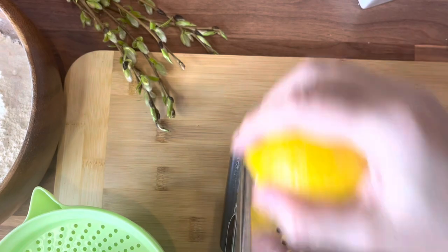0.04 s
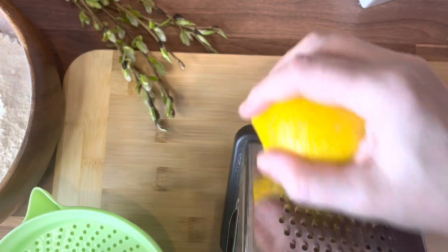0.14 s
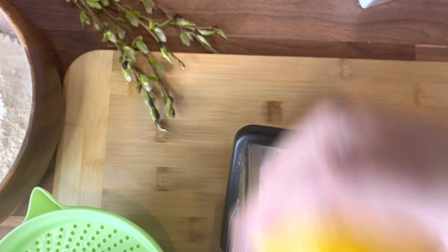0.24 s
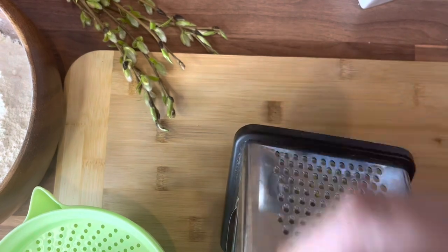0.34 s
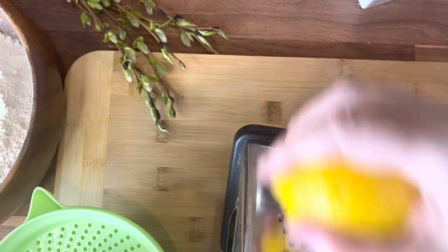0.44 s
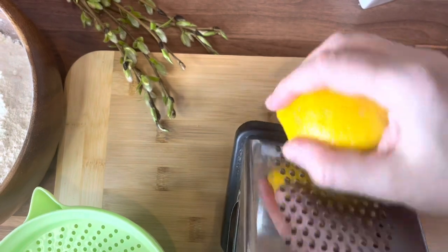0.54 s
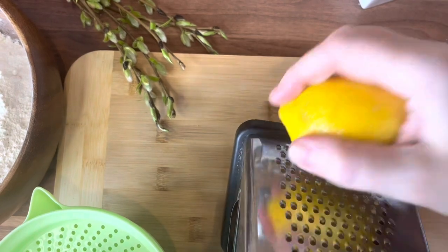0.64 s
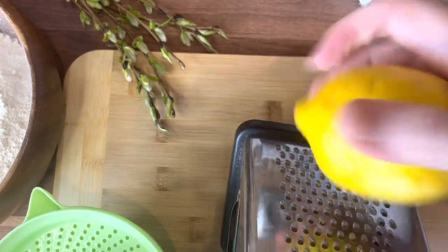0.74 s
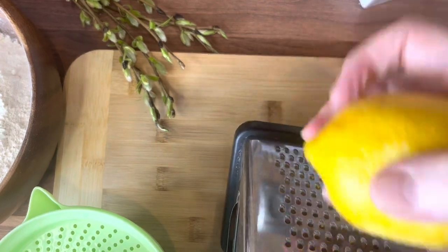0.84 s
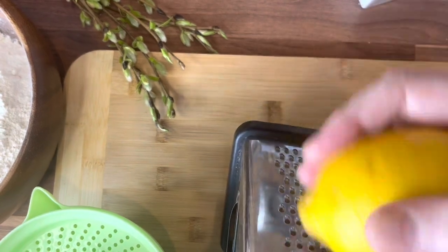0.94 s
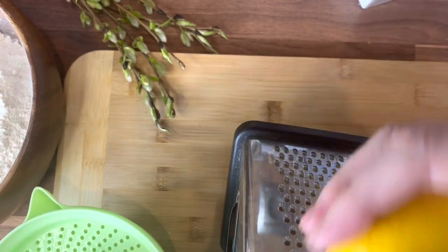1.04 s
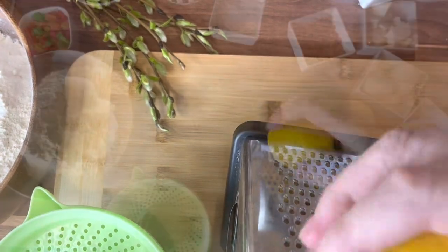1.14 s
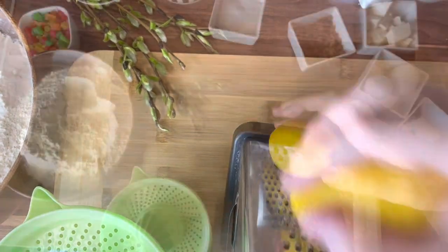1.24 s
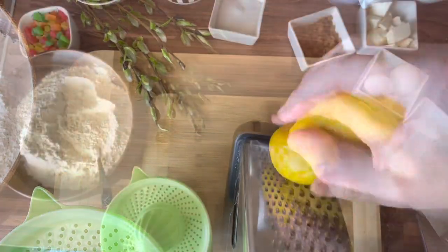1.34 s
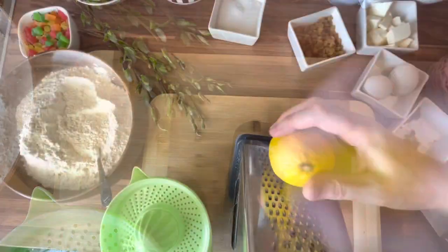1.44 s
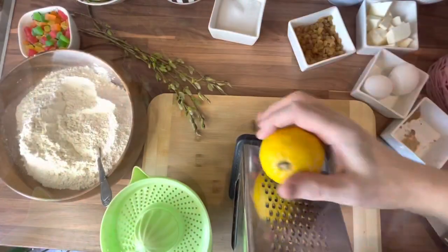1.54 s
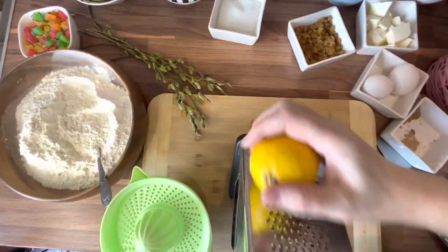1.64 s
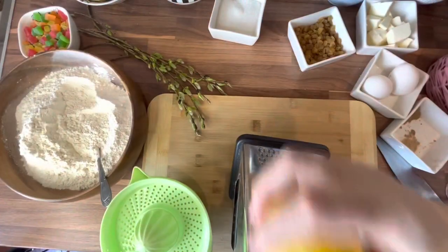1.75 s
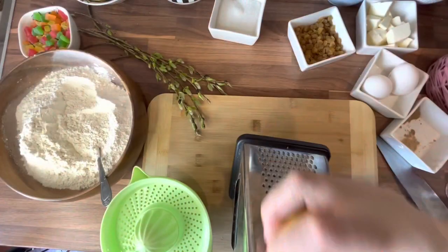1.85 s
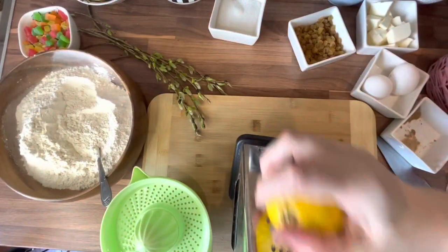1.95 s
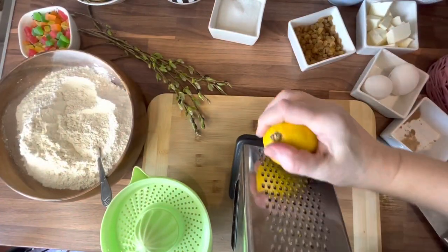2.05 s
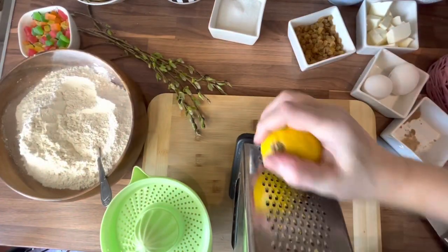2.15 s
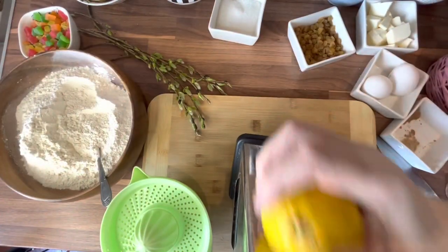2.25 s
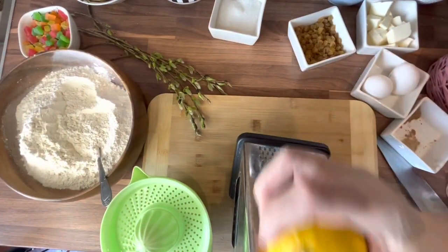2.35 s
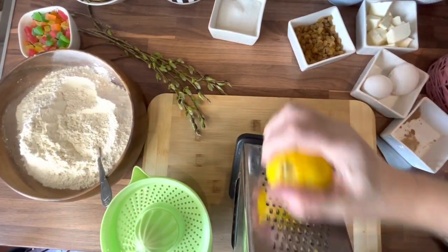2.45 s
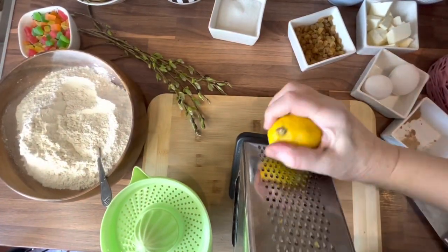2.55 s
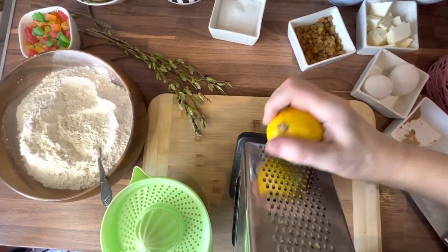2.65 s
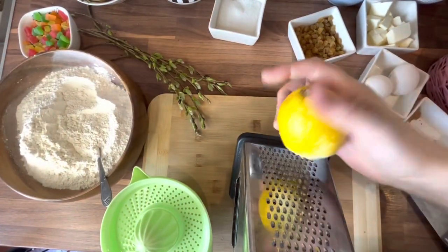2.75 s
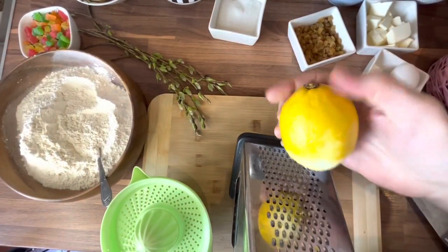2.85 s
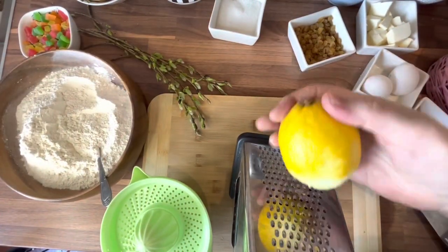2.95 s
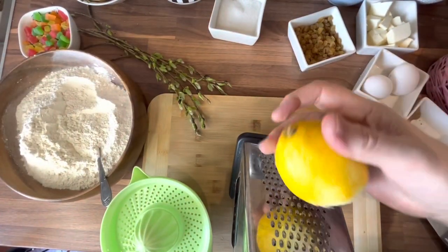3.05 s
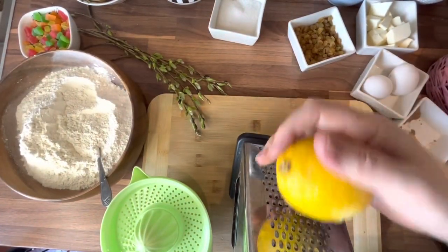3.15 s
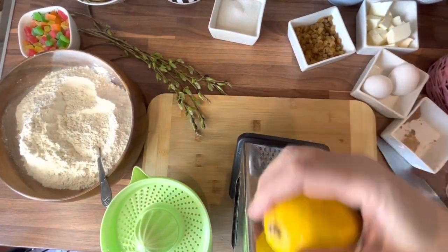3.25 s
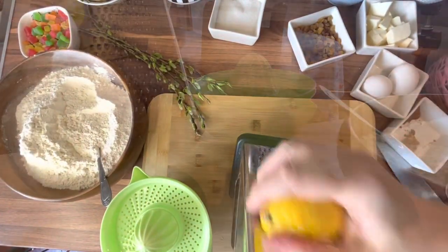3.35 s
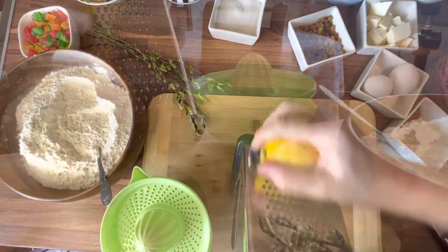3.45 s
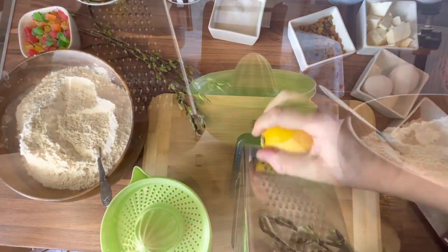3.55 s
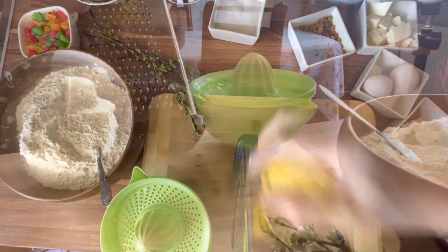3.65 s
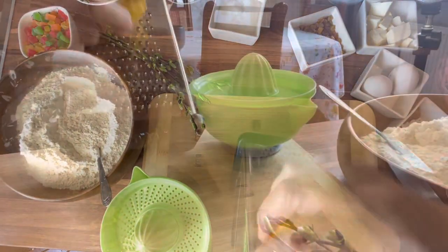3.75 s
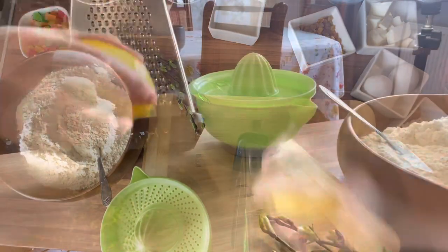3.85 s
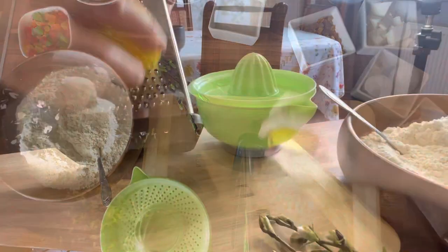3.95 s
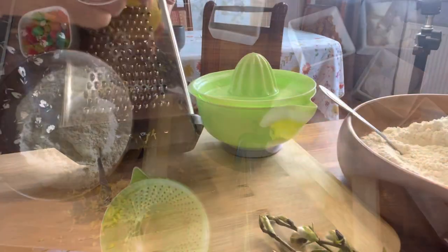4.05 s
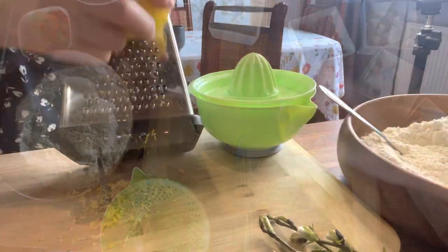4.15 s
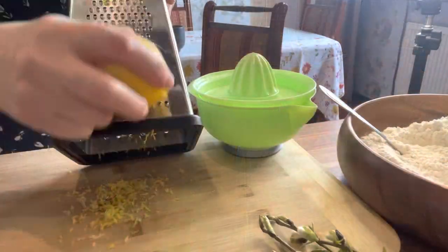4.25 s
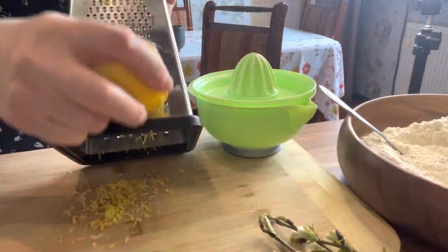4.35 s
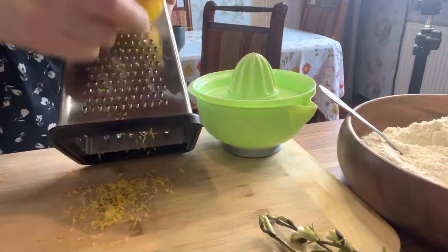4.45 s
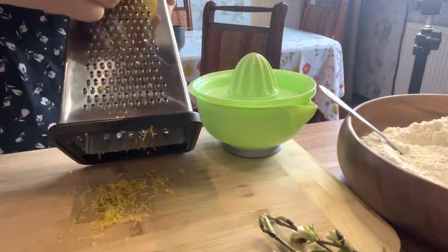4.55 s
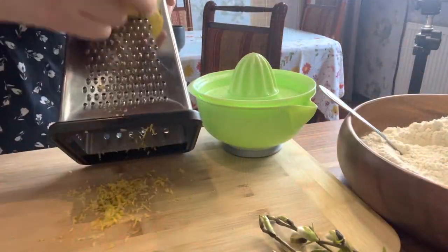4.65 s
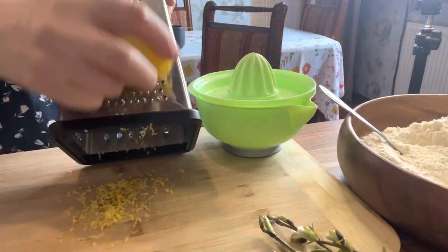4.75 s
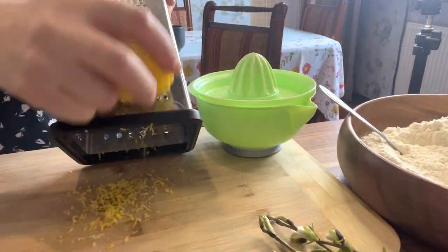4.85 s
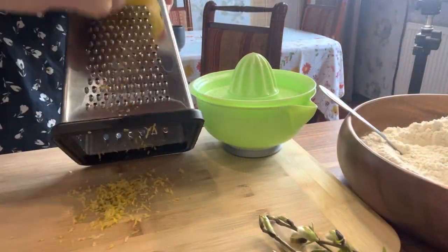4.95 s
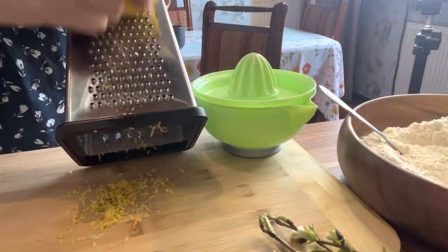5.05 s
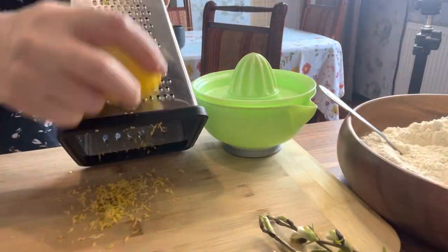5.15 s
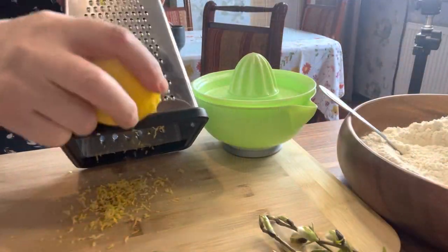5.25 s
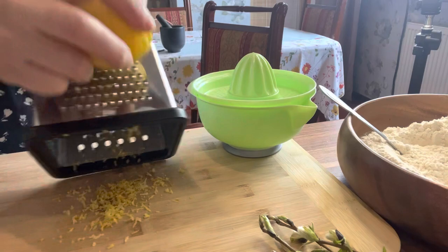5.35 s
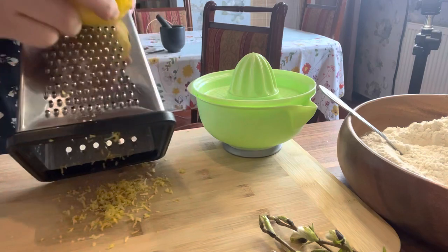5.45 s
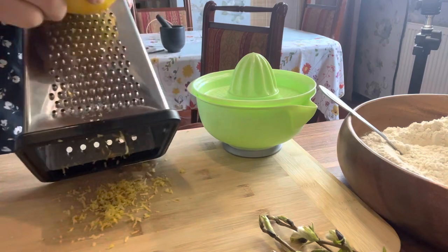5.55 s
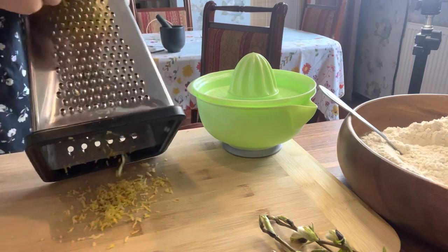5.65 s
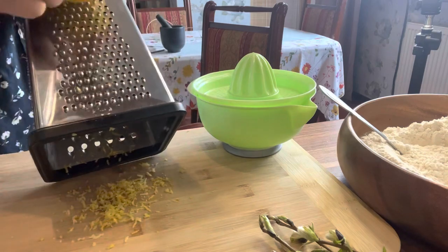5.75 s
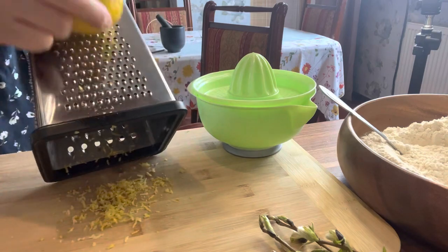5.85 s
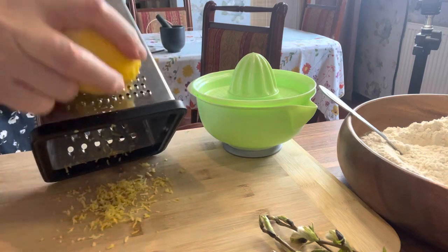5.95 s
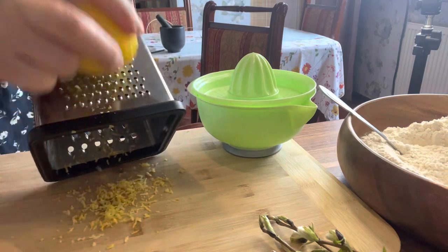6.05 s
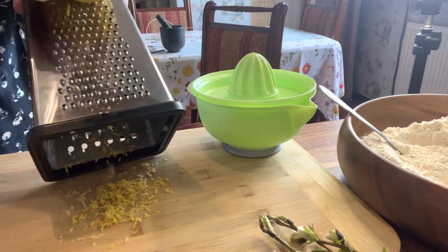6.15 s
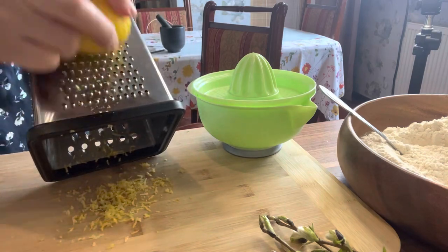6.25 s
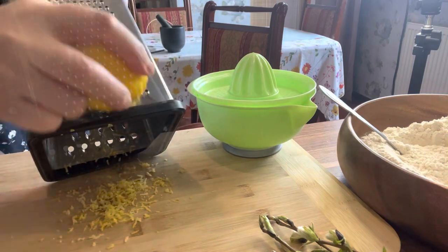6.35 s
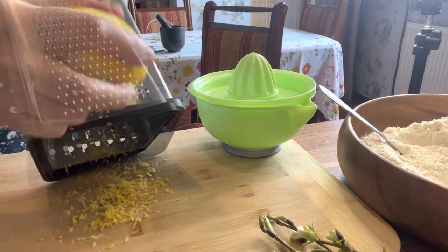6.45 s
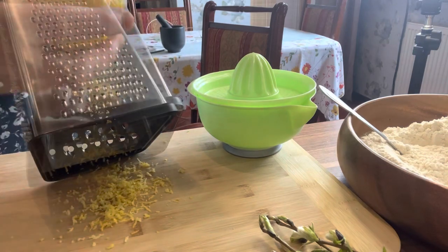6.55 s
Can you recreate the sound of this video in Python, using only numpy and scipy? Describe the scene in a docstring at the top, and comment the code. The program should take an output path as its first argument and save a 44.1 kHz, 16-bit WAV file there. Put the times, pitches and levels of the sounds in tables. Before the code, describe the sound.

A close, wide stereo sound of lemon zesting on a hollow steel box grater over a wooden board, in a lightly reverberant kitchen with very faint rumble and hum. It opens mid-stroke with a low, ringing scrape at 0 s, then coarse rasps of about a tenth of a second at 0.4, 1.2, 1.9 and 2.4 s, the last strongest. Each shakes box and board with a dull judder; sharp tooth ticks mark some bites, and soft knocks precede most strokes. Nearly quiet from about 2.7 to 3.3 s, with faint rubs. Around 3.5 to 3.9 s the perspective shifts from above to the front. Rasps follow at 3.4, 3.8, 4.2, 4.7 and 5.1 s, increasingly bright. A deep thump at 5.2 s leads to a hard return rub with a squeal at 5.3 s. Final strokes at 5.9 and 6.25 s squeak higher, with another thump near 6.35 s.

```python
"""In a kitchen, a lemon is zested on a steel box grater propped on a wooden board: a dozen uneven strokes.
Trains of tooth impulses and noise make the rasp; resonances driven by further impulses ring the steel
and shake box and board. Noise bursts tick, decaying sines thump, and resonant bands squeal or ring low.
The rasp's colour passes from that heard above to that heard in front, over a faint rumble and hum."""
import sys
import numpy as np
from scipy import signal
from scipy.fft import rfft, irfft, next_fast_len
from scipy.io import wavfile
from scipy.ndimage import map_coordinates

SR = 44100
rng = np.random.default_rng(int(sys.argv[2]) if len(sys.argv) > 2 else 0)


def wrap_up_sound(samples):
    """Save the sound to the file named by the first command line argument, as 16-bit audio."""
    columns = np.atleast_2d(samples).T
    # keep every value between -1 and 1, then stretch to whole-number steps
    tamed = np.clip(columns, -1, 1)
    steps = np.round(tamed * 32767).astype(np.int16)
    wavfile.write(sys.argv[1], SR, steps)


N = 291009  # samples

# All tabulated levels are relative: the sources are weighted again where they are mixed.
# Pushes of the lemon down the teeth: (first bite [s], length [s], fall [s], rasp [dB],
# gain of pressure over the pass [dB], treble gain [dB], shaking of the box [dB],
# graze before the bite [s], graze [dB])
STROKES = [ (0.0, 0.089, 0.027, -27, -6.5, -6, -31.5, .01, -45.5),
           (0.39, 0.14, 0.035, -25, -5.5, -4, -31, 0.028, -29.5),
           (1.201, 0.11, 0.051, -23, 1.5, -2.5, -31, 0.032, -41),
           (1.888, 0.12, 0.12, -23.5, 8.5, -3.5, -30, 0.045, -39),
           (2.378, 0.12, .06, -19.5, 1.5, 0.5, -27, .014, -50),
           (3.368, 0.096, 0.093, -24.5, 3.5, -1, -33, 0.027, -38),
           (3.806, 0.13, 0.065, -30.5, 0, 3, -33.5, 0.053, -44),
           (4.18, 0.11, 0.084, -26.5, -3, 4, -27.5, 0.028, -42),
           (4.681, 0.14, 0.028, -25.5, 6, 5.5, -27.5, 0.037, -49.5),
           (5.101, 0.11, 0.055, -23, -8.5, 5.5, -25, 0.026, -37),
           (5.885, .107, 0.054, -25, -3, 7, -26, .052, -38),
           (6.25, 0.11, 0.067, -25, -4.5, 8, -24.5, .02, -39.5)]
# Return rubs of the lemon over the teeth, mostly light, one pressed hard:
# (time [s], length [s], rasp [dB], treble gain [dB], shaking of the box [dB])
RETURN_RUBS = [(0.144, 0.023, -59.5, 3, -54), (0.708, 0.047, -56.5, 4, -87), (0.911, 0.081, -69, 15, -85),
               (1.434, 0.076, -47, -7, -50), (1.565, 0.042, -74.5, 11, -55.5), (1.735, 0.061, -64, 5, -49),
               (2.234, 0.037, -58, 6, -61.5), (2.659, 0.14, -63, 0.5, -62.5), (3.262, 0.038, -66.5, 2, -43),
               (3.622, 0.067, -71.5, -8, -50), (4.085, 0.008, -69, 10, -58), (4.961, 0.051, -66.5, -7, -46),
               (5.315, 0.072, -28, -6, -28.5), (5.522, 0.1, -60, 2.5, -41.5), (6.149, 0.019, -42.5, 0, -39)]
# Squeals of wet peel, and one low ring of the sheet at the first stroke:
# (time [s], length [s], frequency [Hz], level [dB])
SQUEALS_AND_RING = [(0.0, .1, 330, -35.5), (5.293, 0.09, 1950, -33.5), (5.575, 0.064, 1930, -55.5),
                    (5.928, 0.074, 2140, -28.5), (6.223, 0.095, 3500, -31.5)]
# Single teeth flicking free: (time [s], level [dB])
TICKS = [(0.394, -12), (0.756, -38), (0.905, -42.5), (1.178, -31), (1.889, -18.5), (2.373, -11.5),
         (2.854, -40), (2.928, -49.5), (4.679, -16), (5.685, -39.5), (6.226, -25)]
# The lemon landing on the grater: (time [s], knock [dB], swing frequency [Hz], swing [dB])
LANDINGS = [(0.305, -47.5, 69, -43.5), (1.042, -39.5, 130, -44.5), (1.558, -44.5, 130, -47),
            (1.743, -39, 95, -39.5), (2.316, -43, 80, -26), (3.236, -40.5, 77.5, -33.5),
            (3.752, -60, 94, -32.5), (4.143, -52, 190, -38), (4.588, -43.5, 144, -41),
            (5.071, -50, 88, -31), (5.836, -32.5, 75.5, -31)]
# Thumps of the box as the lemon lands on it or jerks across it: (time [s], frequency [Hz], level [dB])
THUMPS = [(0.323, 68, -34), (0.367, 79, -22), (2.369, 81, -33.5), (5.174, 191.5, -13.5),
          (6.353, 193.6, -16)]
# Modes of the steel sheet: (frequency [Hz], width [Hz], level [dB])
STEEL = [(333, 40, -0.5), (468, 30, 1), (656, 54, 0.5), (1026.4, 44, 11.5), (1253, 20, 11),
         (1402, 21, 12.5), (2034, 130, 3.5), (2463, 110, 5), (2640, 45, 6), (2900, 87, 3.5),
         (3010, 30, -10.5), (3820, 88, -16), (3980, 160, -6)]
# Modes of box and board: (frequency [Hz], width [Hz], level [dB])
BOX = [(54.7, 23, -9), (76.7, 9, 2), (133.7, 15.1, 6), (167, 20.4, -1), (193.9, 18.2, 0.5),
       (234.2, 30.2, -6.5), (299, 21, -13.5)]
# Modes of the plastic rim and handle: (frequency [Hz], width [Hz], level [dB])
FRAME = [(477, 86, -6), (680, 49, -4), (1070, 160, -3.5), (1310, 89, -0.5), (2050, 480, -15.5),
         (2670, 340, -23.5)]
# Spectral density of the rasp from above: (frequency [Hz], level [dB])
RASP_ABOVE = [(60, -19), (200, -20.5), (330, -1), (520, -3.5), (800, -10), (1100, -6), (1800, -2),
              (2700, -1), (5200, -4.5), (7800, -15), (12700, -12.5), (14200, -29.5), (15500, -55.5)]
# Spectral density of the rasp from the front: (frequency [Hz], level [dB])
RASP_FRONT = [(60, -14), (280, 7.5), (380, -23.5), (520, -9), (750, 0.5), (1200, 4), (1700, 1.5), (2300, 3),
              (3600, 0.5), (7000, -8), (9800, -11), (12500, -18), (14200, -41.5), (15500, -47.5)]
# Spectral density of a tick: (frequency [Hz], level [dB])
TICK_SPECTRUM = [(100, -13), (500, -12.5), (1100, 4), (2800, 9.5), (5000, -8), (13000, -10), (16000, -38)]
# Dense ring of the steel: (frequency [Hz], 60 dB decay time [s])
SHEET_DECAY = [(300, 0.084), (2000, 0.048), (10000, 0.033)]
# Reverberation of the kitchen: (frequency [Hz], 60 dB decay time [s])
KITCHEN_DECAY = [(100, 0.24), (500, 0.55), (2000, 0.42), (5000, 0.34), (12000, 0.25)]
# Gain of the stereo side signal: (frequency [Hz], level [dB])
SIDE_GAIN = [(100, -25), (220, -18), (400, -4), (700, -3), (1300, -3), (2500, -5), (5000, -1), (12000, -3)]
# Spectral density of the still kitchen: (frequency [Hz], level [dB])
QUIET_SPECTRUM = [(20, -11), (60, 13), (100, 0), (200, -10), (330, -15.5), (600, -32), (1100, -31),
                  (1700, -16.5), (2700, -28), (10000, -39), (14000, -31.5), (15500, -58)]
# Tones of the appliance hum: (frequency [Hz], level [dB])
HUM = [(122, -78), (201, -71.5)]
# The listening point moves from above to the front: (start [s], end [s])
MOVE = [3.45, 3.9]

RAMP_DB = 33.5  # change of level over one rise time or one fall time
ARCH_DB = 3  # the hand is fastest in mid-stroke; the ends are this much softer
BITE_RISE_S = 0.036
GRAZE_EDGE_S, GRAZE_SWELL_DB = 0.034, 4.5  # the peel grazes the teeth, ever harder, then they bite
GRAZE_TREBLE_DB = 3  # a graze only nicks the peel and is brighter
RUB_RISE_S, RUB_FALL_S = 0.079, 0.04
BOX_LEAD_S, BOX_LAG_S = 0.024, 0.027  # the box shakes before the bite and after the cut
BOX_RISE_S, BOX_FALL_S = 0.038, 0.15
TREMBLE_DB, TREMBLE_FALL_S = -20.5, 0.88  # it goes on trembling in the hand
LANDING_CRACK_DB = 5.5  # weight of the teeth's crack at a landing
QUIET_DB = -63
TOP_HZ = 15800


def grating():
    """Forced vibration: the teeth's force yields a rasp, a modal ring of the sheet and a judder of the box."""
    force, brightness, shake = effort()
    t = np.arange(N) / SR
    row_phase = np.cumsum(230 * amp(3.5 * wobble(150))) / SR  # rows pass at an uneven rate, near 230 Hz
    rows = unit(amp(2.5 * np.sin(2 * np.pi * row_phase)))  # the peel catches and slips on each
    crackle = bites(rate=1100, spread_db=4.5) + amp(-8.0) * rng.standard_normal(N)
    tearing = rows * unit(crackle) * force
    treble = filtered(tearing, lambda hz: hz ** 2 / (hz ** 2 + 4500 ** 2))
    tearing = tearing + treble * (brightness - 1)

    front = np.interp(t, MOVE, [0, 1])
    rasp_above = amp(-4.0) * (1 - front) * coloured(tearing, RASP_ABOVE)
    rasp_front = amp(-3.0) * front * coloured(tearing, RASP_FRONT)
    rasp = rasp_above + rasp_front
    ring = np.array([resonate(bites(rate=2000, spread_db=0.5) * force, STEEL) for _ in range(2)])

    box = unit(resonate(bites(rate=600, spread_db=0.5), BOX))
    deep = filtered(box, lambda hz: 1 / (1 + (hz / 165) ** 8))
    force_db = 20 * np.log10(force)
    vigour = np.interp(force_db, [-48, -26], [.55, 1.15])  # a light rub wakes the upper modes less
    judder = shake * (amp(-6.5) * deep + vigour * (box - deep))
    return rasp, ring, judder


def bites(rate, spread_db):
    """Impulsive excitation: regular tooth breaks with jitter, uneven force and random sign; rms 1."""
    count = int(N * rate / SR)
    lateness, size, push = rng.standard_normal((count, 3)).T
    at = ((np.arange(count) + .4 * lateness) * SR / rate).astype(int) % N
    impulse = np.sign(push) * amp(spread_db * np.clip(size, -2, 2))
    return unit(np.bincount(at, impulse, N))


def effort():
    """Superposition of contacts: strokes and return rubs set rasp strength, treble gain and box shaking."""
    rasp, bright, shake = np.zeros((3, N))
    for s, length, fall, db, press_db, treble_db, shake_db, lead, graze_db in STROKES:
        graze = amp(graze_db) * contact(s - lead, lead, GRAZE_EDGE_S, GRAZE_EDGE_S, GRAZE_SWELL_DB)
        cut = amp(db) * contact(s, length, BITE_RISE_S, fall, press_db)
        rasp += np.maximum(cut, graze)
        bright += amp(treble_db) * np.maximum(cut, amp(GRAZE_TREBLE_DB) * graze)
        load = s - BOX_LEAD_S, BOX_LEAD_S + length + BOX_LAG_S, BOX_RISE_S
        shaking = contact(*load, BOX_FALL_S, press_db=4)
        trembling = amp(TREMBLE_DB) * contact(*load, TREMBLE_FALL_S)
        shake += amp(shake_db) * np.maximum(shaking, trembling)
    for s, length, db, treble_db, shake_db in RETURN_RUBS:
        rub = contact(s, length, RUB_RISE_S, RUB_FALL_S)
        rasp += amp(db) * rub
        bright += amp(db + treble_db) * rub
        shake += amp(shake_db) * contact(s, length + BOX_LAG_S, RUB_RISE_S, BOX_FALL_S)
    return rasp, bright / rasp, shake


def contact(s, length, rise, fall, press_db=0):
    """Contact envelope: the gain rises, arches while the pressure drifts, and falls, linearly in dB outside."""
    t = np.arange(N) / SR - s
    travel = np.clip(t / length, 0, 1) - .5
    outside = np.maximum(-t, 0) / rise + np.maximum(t - length, 0) / fall
    gain_db = press_db * travel - ARCH_DB * (2 * travel) ** 2 - RAMP_DB * outside
    return amp(np.maximum(gain_db, -200))


def squeals_and_ring(relative_width):
    """Resonant selection: tooth impulses pass twice through one broad band per squeal or low ring."""
    out, t = np.zeros(N), np.arange(N) / SR
    for s, length, hz, db in SQUEALS_AND_RING:
        swell = np.sin(np.pi * np.clip((t - s) / length, 0, 1))
        mode = [(hz, relative_width * hz, 0)]
        once = resonate(bites(rate=900, spread_db=3.5), mode)
        out += amp(db) * swell * unit(resonate(once, mode))
    return out


def ticks():
    """Impact radiation: teeth crack in short bursts; a landing cracks more slowly and rings the frame."""
    knocks = [(s, db) for s, db, *_ in LANDINGS]
    tooth_cracks = bursts(TICKS, t60=0.018, attack=0.00037)
    landing_cracks = amp(LANDING_CRACK_DB) * bursts(knocks, t60=0.023, attack=0.0034)
    frame = resonate(bursts(knocks, t60=0.24, attack=.0015), FRAME)
    return amp(-4.5) * coloured(tooth_cracks + landing_cracks, TICK_SPECTRUM) + amp(-13) * frame


def bursts(events, t60, attack):
    """Exponential decay: a short dying burst of noise for each (time [s], level [dB])."""
    out, t = np.zeros(N + SR), np.arange(SR // 5) / SR
    for s, db in events:
        envelope = amp(db - 60 * t / t60) * (1 - np.exp(-t / attack))
        out[round(s * SR):][:len(t)] += envelope * rng.standard_normal(len(t))
    return out[:N]


def thumps(t60, attack):
    """Damped free oscillation: box and board swing briefly when the load on them jumps."""
    out, t = np.zeros(N + SR), np.arange(SR // 3) / SR
    swings = list(THUMPS) + [(s, hz, db) for s, _, hz, db in LANDINGS]
    for s, hz, db in swings:
        envelope = amp(db - 60 * t / t60) * (1 - np.exp(-t / attack))
        out[round(s * SR):][:len(t)] += np.sin(2 * np.pi * hz * t) * envelope
    return out[:N]


def diffuse(x, decay, length, count):
    """Diffuse field: two unrelated decaying-noise tails of x, redrawn count times as hand and lemon move."""
    out, hop = np.zeros((2, N + 2 * SR)), N // count + 1
    noise = rng.standard_normal((count, 2, int(length * SR)))
    hz, t, z = signal.stft(noise, SR, nperseg=128)
    fading = amp(-60 * t / along(decay, hz)[:, None])
    tails = signal.istft(z * fading, SR, nperseg=128)[1]
    for k, tail in enumerate(tails):
        piece = x[None, k * hop:(k + 1) * hop]
        part = signal.fftconvolve(piece, tail / np.linalg.norm(tail[0]), axes=1)
        out[:, k * hop:][:, :part.shape[1]] += part
    return out[:, :N]


def room_tone():
    """Stationary background: coloured noise, weaker in the side, and a central phase-wandering appliance hum."""
    mid, side = [coloured(rng.standard_normal(N), QUIET_SPECTRUM) for _ in range(2)]
    t = np.arange(N) / SR
    hum = sum(amp(db) * unit(np.sin(2 * np.pi * hz * t + .5 * wobble(3.3))) for hz, db in HUM)
    return np.array([amp(QUIET_DB) * mid + hum, amp(QUIET_DB - 5.0) * side])


def resonate(x, modes):
    """Modal superposition: x through a bank of resonances of unit mean power gain, alternating in sign."""
    def response(f):
        bank = 0
        for k, (centre, width, db) in enumerate(modes):
            damping = 1j * f * width
            bank = bank + (-1) ** k * amp(db) * damping / (centre * centre - f * f + damping)
        return bank / np.sqrt(np.mean(abs(bank) ** 2))
    return filtered(x, response)


def coloured(x, spectrum, size=4096):
    """Minimum phase: x through a causal filter of unit energy with the given spectrum."""
    log_gain = np.log(amp(along(spectrum, np.fft.rfftfreq(size, 1 / SR))) + 1e-6)
    cepstrum = irfft(log_gain)
    cepstrum[1:size // 2] *= 2  # folding the cepstrum makes the filter causal
    cepstrum[size // 2 + 1:] = 0
    pulse = irfft(np.exp(rfft(cepstrum)))
    return signal.oaconvolve(x, pulse / np.linalg.norm(pulse))[:N]


def filtered(x, response):
    """Linear filtering: the spectrum of x times a complex response of frequency."""
    size = next_fast_len(N + SR // 2)
    return irfft(rfft(x, size) * response(np.fft.rfftfreq(size, 1 / SR)), size)[..., :N]


def along(points, hz):
    """Logarithmic frequency scale: interpolates (frequency [Hz], value) points."""
    f, v = np.transpose(points)
    return np.interp(np.log(hz + 1), np.log(f + 1), v)


def wobble(rate):
    """Band-limited fluctuation: a smooth random curve with rate knots a second."""
    return map_coordinates(rng.standard_normal(int(N * rate / SR) + 4), [np.arange(N) * rate / SR])


def amp(db):
    """Decibel scale: amplitude ratio of a level."""
    return 10 ** (np.asarray(db) / 20)


def unit(x):
    """Normalisation: x scaled to rms 1."""
    return x / np.sqrt(np.mean(x ** 2) + 1e-20)


def scene():
    """Directivity: the sheet radiates differently each way, so the rasp is wide and the bass is central."""
    rasp, ring, judder = grating()
    steel = rasp + ticks() + squeals_and_ring(relative_width=0.19)
    low = judder + thumps(t60=.14, attack=0.0017)
    sheet = diffuse(steel, SHEET_DECAY, length=.08, count=160)
    room_drive = steel + amp(-7.5) * ring[0] + amp(5.5) * low
    room = amp(-15) * diffuse(room_drive, KITCHEN_DECAY, length=.6, count=30)

    mid = amp(-3) * steel + amp(-2.0) * sheet[0] + amp(-9.0) * ring[0] + low + room[0]
    low_side = diffuse(low, SHEET_DECAY, length=0.071, count=60)[1]
    side = sheet[1] + amp(-11.5) * ring[1] + amp(3.5) * low_side + amp(3.0) * room[1]
    side = filtered(side, lambda hz: amp(along(SIDE_GAIN, hz)))
    mid, side = np.array([mid, side]) + room_tone()

    lean_db = np.interp(np.arange(N) / SR, MOVE, [.7, -.1])  # from above, a little to the left
    left, right = mid + side, mid - side
    return np.array([left * amp(lean_db), right * amp(-lean_db)])


def record(dry):
    """Band limitation: only frequencies below TOP_HZ are kept."""
    return filtered(dry, lambda hz: hz < TOP_HZ)


dry = scene()
out = record(dry)
wrap_up_sound(out)
```